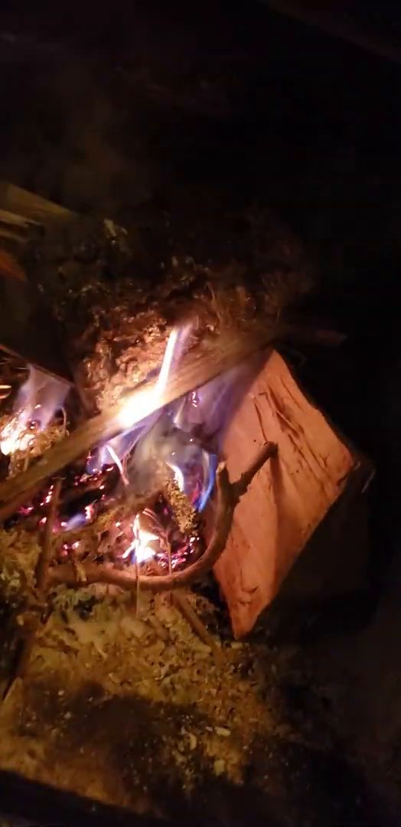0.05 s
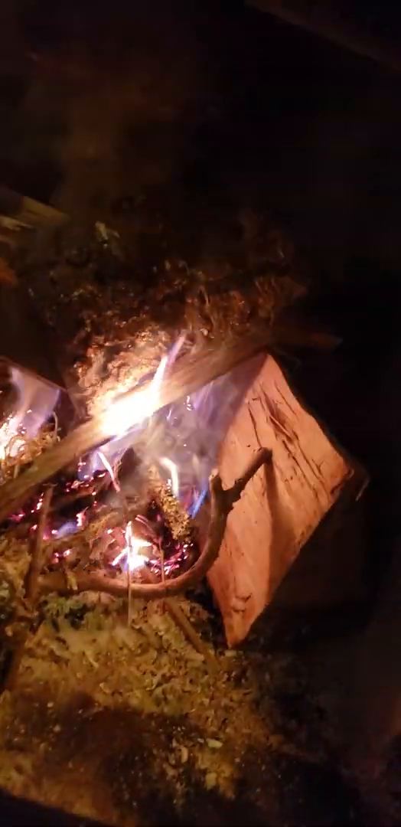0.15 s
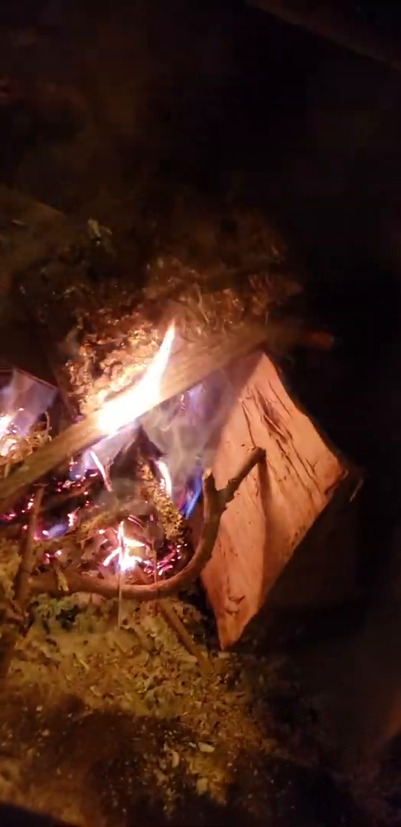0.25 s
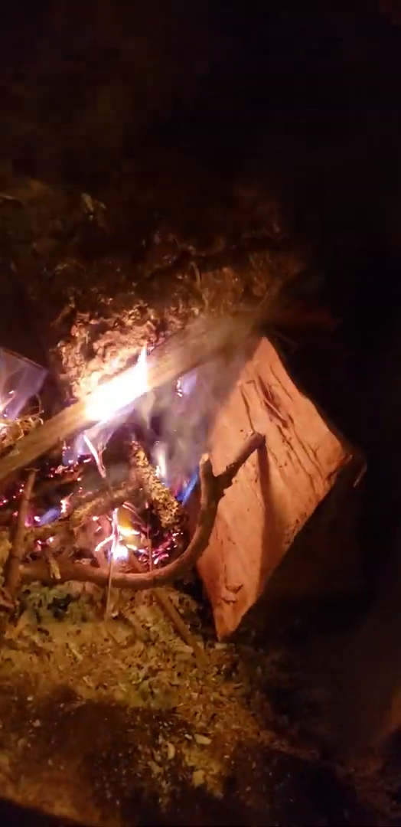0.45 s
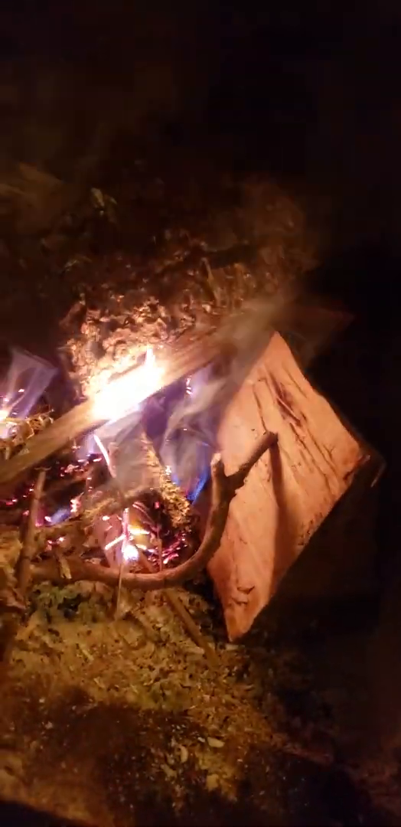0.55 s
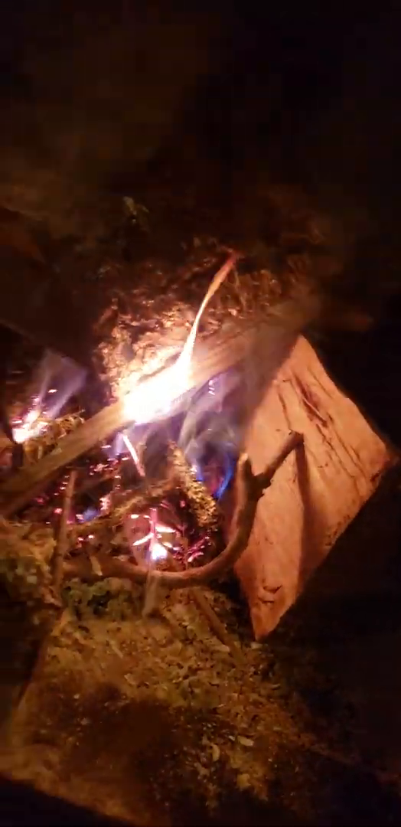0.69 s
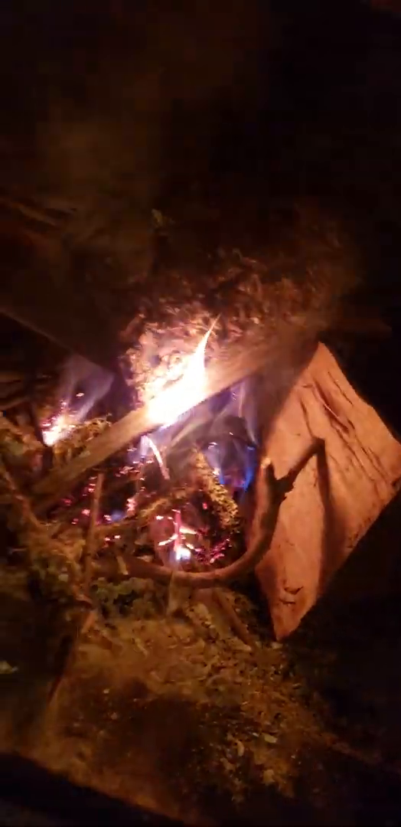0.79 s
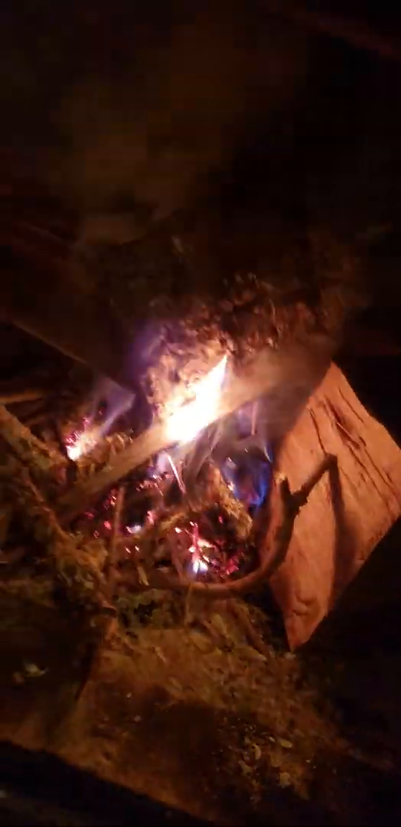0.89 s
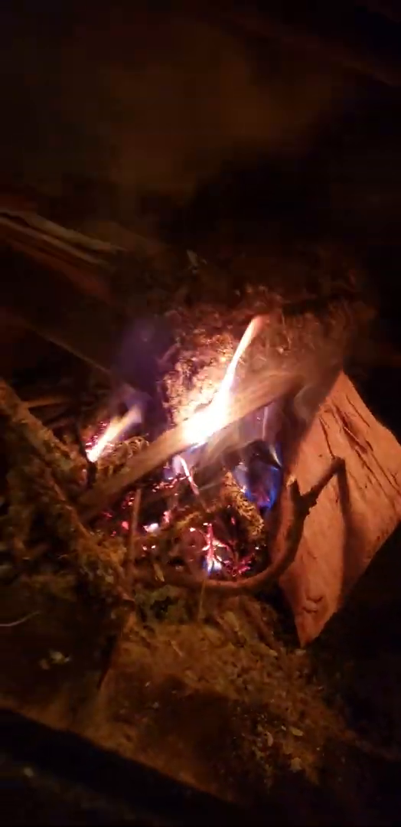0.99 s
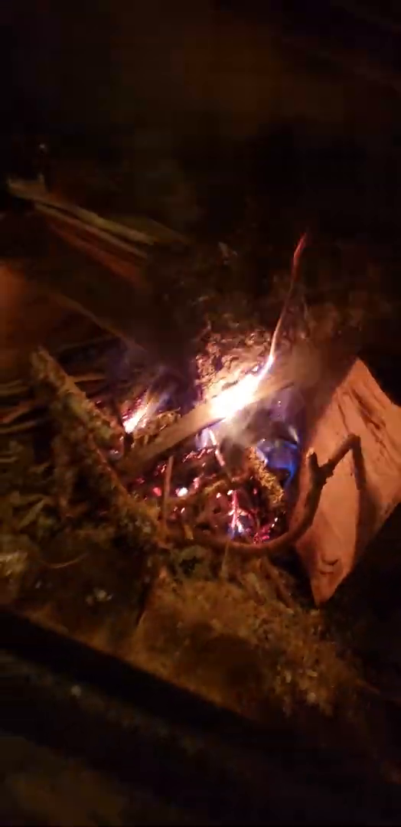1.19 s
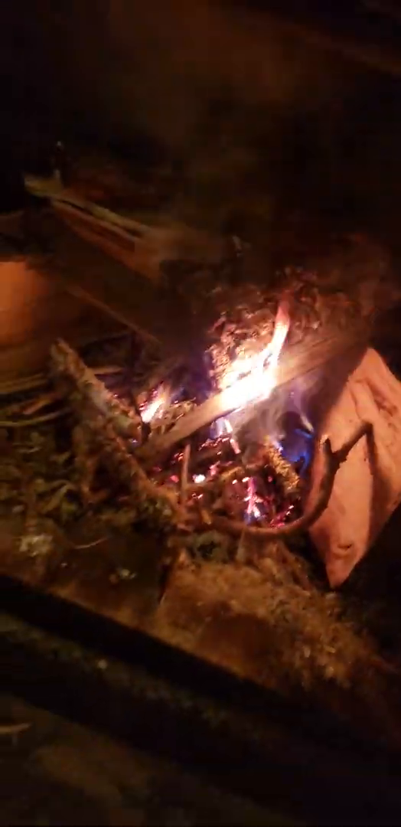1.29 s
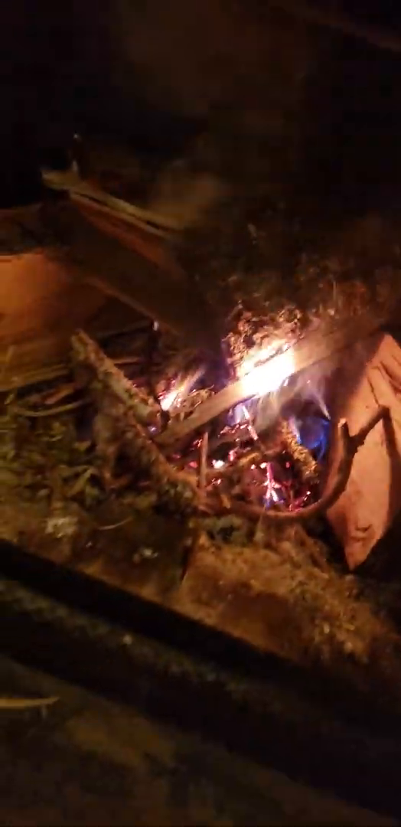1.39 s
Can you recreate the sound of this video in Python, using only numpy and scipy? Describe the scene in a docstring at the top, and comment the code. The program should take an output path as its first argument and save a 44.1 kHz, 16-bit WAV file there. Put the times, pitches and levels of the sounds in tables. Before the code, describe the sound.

Small wood fire crackling close up, sharp irregular snaps over thin sizzle and a few dull knocks

```python
"""Kindling snaps in the open firebox of a wood stove, heard from close by: broadband bursts with a noisy decay.
Random tiny bursts make the fine crackle, grainy noise the thin sizzle, a narrow noise band a short gas whistle.
The draught hums as noise shaped by low resonances of the firebox.
Soft knocks excite decaying low modes and a dull rattle; a stick scrapes in brief strokes of tiny slips."""
import sys
import numpy as np
from scipy import signal
from scipy.fft import rfft, irfft, next_fast_len
from scipy.io import wavfile

SR = 44100
rng = np.random.default_rng(int(sys.argv[2]) if len(sys.argv) > 2 else 0)


def master(y):
    """Save y as 16-bit WAV."""
    cut = np.clip(np.atleast_2d(y).T, -1, 1)
    pcm = np.round(cut * 32767)  # scale
    wavfile.write(sys.argv[1], SR, pcm.astype(np.int16))


N = 63945
TIME = np.arange(N) / SR  # [s]
SNAP_RISE_S = 0.00009
LOW_PAN_DB = 2.26  # positive pans favour the left


def from_db(db):
    """Logarithmic levels: 20 dB is a factor of ten in amplitude."""
    return 10 ** (np.asarray(db) / 20)


def rms_one(x):
    """Power normalisation: scale to unit rms over all channels together."""
    return x / np.sqrt(np.mean(x ** 2) + 1e-20)


def unit_energy(x):
    """Energy normalisation: scale each channel to a unit sum of squares."""
    return x / np.sqrt(np.sum(x ** 2, axis=-1, keepdims=True) + 1e-20)


def pan(db):
    """Interaural level difference: left over right, split evenly between the two gains."""
    return from_db(np.array([[.5], [-.5]]) * db)


def colour(x, points):
    """Minimum-phase filtering: the folded cepstrum of a (frequency [Hz], gain [dB]) curve is causal."""
    size = next_fast_len(2 * N) // 2 * 2
    hz, db = np.transpose(points)
    bins_hz = np.arange(size // 2 + 1) * SR / size
    curve_db = np.interp(np.log(bins_hz + 1), np.log(hz), db)
    cepstrum = irfft(np.log(from_db(curve_db)))
    cepstrum[1:size // 2] *= 2
    cepstrum[size // 2 + 1:] = 0
    response = np.exp(rfft(cepstrum))
    return irfft(rfft(x, size) * response)[..., :N]


def at_ears(x, left, right):
    """Interaural spectral difference: each side has its own colour."""
    return np.array([colour(x[0], left), colour(x[1], right)])


def convolve(x, response):
    """Linear superposition: every sample of x starts a scaled copy of the impulse response."""
    return signal.fftconvolve(np.atleast_2d(x), np.atleast_2d(response), axes=-1)[:, :N]


def drift(rate):
    """Low-passed noise: two equal poles at the rate [Hz] give a random signal of unit rms."""
    pole = np.exp(-2 * np.pi * rate / SR)
    slow = signal.lfilter([1], [1, -2 * pole, pole * pole], rng.standard_normal(2 * N))
    return rms_one(slow[N:])  # the first half lets the filter settle


def wide_noise(side_db):
    """Mid-side stereo: the level of the opposed part sets the width of white noise."""
    mid, side = rng.standard_normal((2, N))
    return mid + from_db(side_db) * np.array([side, -side])


def add(out, s, sound):
    """Superposition in time: mix a short sound in at s seconds."""
    start = int(np.clip(s * SR, 0, N - 1))
    out[..., start:start + sound.shape[-1]] += sound[..., :N - start]


def fracture(splinter_ms, size=1024):
    """Impulsive release: a flat-spectrum crack, then a decaying spray of splintering and near reflections."""
    splinter_db = 3
    t = TIME[:size]
    crack = unit_energy(rng.standard_normal(size) * t * np.exp(-t / SNAP_RISE_S))
    crack = irfft(np.exp(1j * np.angle(rfft(crack))))  # keep the phase, flatten the spectrum
    envelope = (1 - np.exp(-t / SNAP_RISE_S)) * np.exp(-t * 1000 / splinter_ms)
    spray = unit_energy(rng.standard_normal((2, size)) * envelope)
    first_half = t < t[-1] / 2
    return unit_energy(crack * first_half + from_db(splinter_db) * spray)


def crackle(spots=6):
    """Random shot process: countless tiny bursts, each spot in the embers with its own waveform."""
    bursts_per_s, least_db, spread_db = 320, -44, 3
    out = 0
    for _ in range(spots):
        sizes = from_db(least_db + spread_db * np.minimum(rng.exponential(1, N), 3))
        strikes = rng.random(N) < bursts_per_s / spots / SR
        out = out + convolve(sizes * strikes, fracture(splinter_ms=1.0))
    return out


def firebox(x):
    """Diffuse reverberation: the walls return a faint wash; interaural delay makes the right side later."""
    echo_db, echo_t60_s, echo_rise_s, right_lag_s = -21.5, 0.25, 0.024, 0.0001
    swell = 1 - np.exp(-TIME / echo_rise_s)
    decay = from_db(-60 * TIME / echo_t60_s)
    wash = unit_energy(rng.standard_normal((2, N)) * swell * decay)
    x = x + from_db(echo_db) * convolve(x, wash)
    # a linear phase delays by a fraction of a sample
    delay = np.exp(-1j * np.pi * np.arange(N + 1) / N * right_lag_s * SR)
    late = irfft(rfft(x[1], 2 * N) * delay)
    return np.array([x[0], late[:N]])


def sizzle(grain_db=2.5):
    """Amplitude-modulated noise: sap boils out of the wood as a fine, grainy hiss."""
    # course of the hiss: (time [s], level [dB])
    hiss_level = [(0, -55.5), (.13, -59), (.19, -53), (.27, -60), (.36, -58), (.47, -62.5), (.53, -53),
                  (.56, -52), (.62, -55.5), (.73, -53.5), (.8, -56.5), (.91, -60.5), (.965, -51.5),
                  (1.01, -62), (1.065, -58), (1.095, -51.5), (1.15, -58), (1.33, -63), (1.45, -62.5)]
    # spectrum of the hiss at each ear: (frequency [Hz], gain [dB])
    hiss_left = [(600, -7.5), (1100, -12), (1800, -22), (2750, -17), (3500, -17), (5200, -12), (6400, -7.5),
                 (7300, -1.5), (8800, -17), (11000, -6.5), (13500, -7), (15500, -1.5)]
    hiss_right = [(600, -11.5), (1400, -15), (2500, -9.5), (3500, -18), (5100, -7), (6600, -17),
                  (8000, -12), (9200, -13), (11500, -9), (13500, 0.5), (15500, -13)]
    fizz = rng.standard_normal((2, N)) * from_db(grain_db * drift(210))
    level_db = np.interp(TIME, *np.transpose(hiss_level))
    return rms_one(at_ears(fizz, hiss_left, hiss_right)) * from_db(level_db)


def draught():
    """Resonant filtering: moving air hums in the low resonances of the firebox."""
    # relative spectrum of the hum: (frequency [Hz], spectral density [dB per Hz])
    resonances = [(20, -14), (45, -13.5), (75, -8.5), (102, 3.5), (135, -7.5), (165, -13.5), (195, -10.5),
                  (250, -15.5), (318, -10.5), (400, -26.5), (700, -32), (1300, -48), (3000, -58)]
    level_db, side_db = -56.5, -17.5
    return from_db(level_db) * rms_one(colour(wide_noise(side_db), resonances))


def snaps():
    """Sudden pressure release: gas pockets burst, each with its own share of body below the treble."""
    # bursts: (time [s], relative level [dB], body gain [dB], splintering time constant [ms], pan [dB])
    bursts = [(0.0293, -35.5, 3, 2.7, -0.5), (0.0604, -47, 2, 0.78, 3), (.0930, -42.5, 12, 2.7, -3),
              (0.145, -61, 0, 1, 1), (0.1554, -26, -20.5, 0.27, -0.5), (0.2972, -46, 11.5, 3.6, -2),
              (.3099, -39.5, -2, .7, -3), (0.3264, -52, 13.5, 3.6, -4), (0.3779, -22.5, -6.5, 1.35, -2),
              (.4111, -49, 2, 0.72, -5), (0.4291, -47, 2.5, 0.99, -7.5), (0.4337, -43.5, -0.5, 1.9, 1),
              (.4831, -44, -15, 0.28, 3), (0.4973, -33, -30, 0.32, 2), (.5142, -39, -8, 1.2, -12),
              (0.564, -41.5, -27, 0.89, 11), (0.643, -41.5, 5.5, 1.4, -9), (0.7431, -31.5, -8, 3.9, -3),
              (0.8357, -35.5, 12, 3.05, -2), (0.937, -16, 2.5, 1.57, 1.5), (1.0361, -33.5, -15, 1.3, 0),
              (1.0480, -36, -16, 1.7, -3), (1.0581, -43, 2, 3, 0.5), (1.1432, -38, -18, 0.67, -7),
              (1.1785, -47.5, -5, 1.6, -10), (1.2082, -42.5, -3.5, 0.8, -2), (1.2678, -36.5, -5, 0.48, -3),
              (1.2705, -34.5, -5, 0.96, -12), (1.44, -31.5, -4, 1.8, 1.5)]
    raise_db, body_hz = 20.5, 8900
    out = np.zeros((2, N))
    low = signal.butter(2, body_hz, fs=SR, output="sos")
    high = signal.butter(2, body_hz, "high", fs=SR, output="sos")
    for s, db, body_db, splinter_ms, pan_db in bursts:
        burst = fracture(splinter_ms)
        body = from_db(body_db) * signal.sosfilt(low, burst)
        burst = body - signal.sosfilt(high, burst)  # the minus sign aligns the bands at the crossover
        add(out, s, from_db(db + raise_db) * pan(pan_db) * burst)
    return out


def jet(pan_db=5):
    """Narrow-band resonance: gas escapes through a crack with a faint, breathy whistle."""
    start_s, length_s, level_db = 0.14, 0.098, -61.5
    pitch_hz, width_hz = 7610, 200
    b, a = signal.iirpeak(pitch_hz, pitch_hz / width_hz, fs=SR)
    whistle = rms_one(signal.lfilter(b, a, rng.standard_normal((2, N))))
    progress = np.clip((TIME - start_s) / length_s, 0, 1)
    swell = np.sqrt(np.abs(np.sin(np.pi * progress)))
    return from_db(level_db) * pan(pan_db) * swell * whistle


def knocks(side_db=-17, size=2048):
    """Modal excitation: soft pushes ring the stove's damped modes and leave a dull rattle."""
    # pushes on the stove: (time [s], relative level [dB], contact time scale [ms])
    contacts = [(0.153, -42.5, 1.94), (.5485, -32, 2.2), (0.5584, -30, 1.87), (.5640, -33, 1.58),
                (0.6503, -53, .6), (.6660, -26, 7.4), (0.734, -33.5, 10.3), (0.791, -49, 1.6),
                (.8200, -39, 6.6), (.9400, -51, 3.9), (.9980, -46.5, 4.04)]
    # modes of the stove: (frequency [Hz], relative level [dB], 60 dB decay time [s])
    stove_modes = [(69.65, -12, 0.88), (100.2, -1, 0.3), (116.04, -6, 0.51), (155.5, -2, 0.12),
                   (185.2, 3, 0.05), (198.6, -13, 0.64), (242, -13.5, 0.11), (279, -14, 0.73),
                   (323, -12, 0.37), (339, 2.5, 0.054), (443, -17, .06), (574, -13, 0.081),
                   (690, -35, 0.042), (830, -44, 0.091), (1170, -41, .09)]
    # spectrum of the dull rattle: (frequency [Hz], gain [dB])
    rattle_colour = [(30, -25.5), (70, 0.5), (170, -6), (340, -7), (500, -21.5), (800, -15.5), (1500, -19),
                     (4000, -58.5)]
    rattle_db, rattle_t60_s, low_cut_hz = 26, 0.49, 99.5
    pushes = np.zeros(N)
    for s, db, contact_ms in contacts:
        t = TIME[:size] * 1000 / contact_ms
        push = t ** 3 * np.exp(-3 * np.pi * t)  # a longer contact excites less treble
        add(pushes, s, from_db(db) * push / push.sum())
    ringing = sum(from_db(db - 60 * TIME / t60) * np.sin(2 * np.pi * hz * TIME) for hz, db, t60 in stove_modes)
    rattle = colour(wide_noise(side_db), rattle_colour) * from_db(-60 * TIME / rattle_t60_s)
    response = ringing + from_db(rattle_db) * unit_energy(rattle)
    low_cut = signal.butter(2, low_cut_hz, "high", fs=SR, output="sos")
    return signal.sosfilt(low_cut, convolve(pushes, response))


def scrapes():
    """Stick-slip friction: bark drags over ash and iron in tiny slips, and loose ash trickles after it."""
    # strokes of the stick: (time [s], length [s], level [dB])
    strokes = [(0.543, 0.025, -47.5), (0.639, 0.015, -46), (0.646, 0.0061, -48), (0.726, 0.0029, -64)]
    # spectrum of the slips: (frequency [Hz], gain [dB])
    slip_colour = [(200, -13), (440, 7), (520, 4.5), (680, 6), (1000, -8.5), (1280, -5), (1700, -10.5),
                   (2400, -11), (3300, -18), (5000, -13), (7500, -15), (9500, -21.5), (13000, -14.5),
                   (16000, -16.5)]
    rise_s, fall_s, tail_db, tail_s = 0.0019, 0.015, -17.5, 0.077
    slips_per_s, spread_db, side_db = 5000, 3.5, -2  # slip rate holds for mid and side each
    force = 0
    for s, length, db in strokes:
        after = np.maximum(TIME - s - length, 0)
        release = np.exp(-after / fall_s) + from_db(tail_db) * np.exp(-after / tail_s)
        onset = np.clip((TIME - s) / rise_s, 0, 1)
        force = force + from_db(db) * onset * release
    sizes = from_db(spread_db * np.minimum(rng.exponential(1, (2, N)), 3))
    signs = rng.choice([-1, 1], (2, N))
    mid, side = sizes * signs * (rng.random((2, N)) < slips_per_s / SR)
    slips = mid + from_db(side_db) * np.array([side, -side])
    return force * rms_one(colour(slips, slip_colour))


def scene():
    """Superposition: the fire, the stove and the stick sound together."""
    # spectrum of the snaps and crackle at each ear: (frequency [Hz], gain [dB])
    snap_left = [(300, -24.5), (1000, -26), (1900, -21), (2750, -13), (3300, -20.5), (3800, -6),
                 (4300, -17.5), (4900, -9.5), (6200, -8), (7250, -2.5), (8300, -13.5), (9500, -13.5),
                 (11500, -9), (13500, -2), (15400, -1), (16500, 1.5)]
    snap_right = [(300, -12.5), (1000, -28), (1900, -14), (2550, -12.5), (3500, -21), (4500, -9.5),
                  (5500, -6), (6400, -31), (8100, -7), (9500, -23), (11200, -9.5), (12600, -2.5),
                  (14000, 0.5), (15400, 4), (16500, -7)]
    fire = at_ears(firebox(crackle() + snaps()), snap_left, snap_right)
    stove = pan(LOW_PAN_DB) * (draught() + knocks())
    return fire + sizzle() + jet() + stove + scrapes()


def record(dry):
    """Band limitation: a steep elliptic low-pass removes the top above 15.8 kHz."""
    low_pass = signal.ellip(10, .2, 80, 15800, fs=SR, output="sos")  # ripple 0.2 dB, stopband 80 dB down
    return signal.sosfilt(low_pass, dry)


dry = scene()
out = record(dry)
master(out)
```